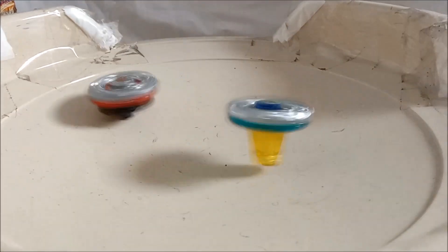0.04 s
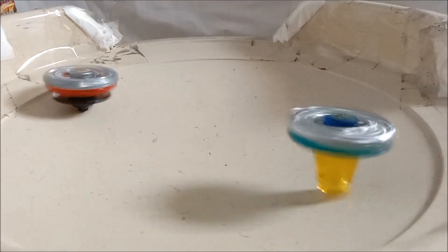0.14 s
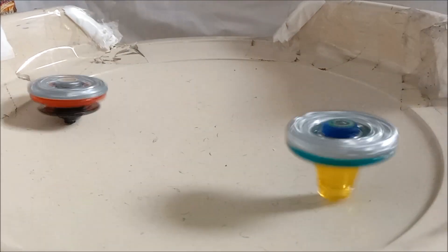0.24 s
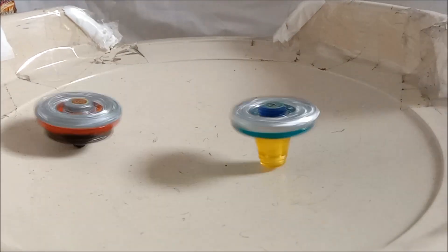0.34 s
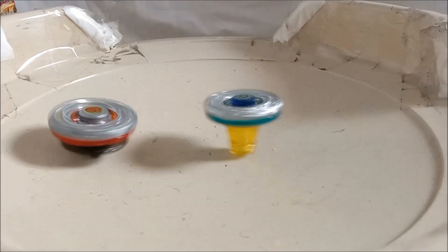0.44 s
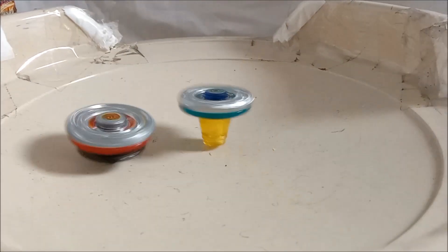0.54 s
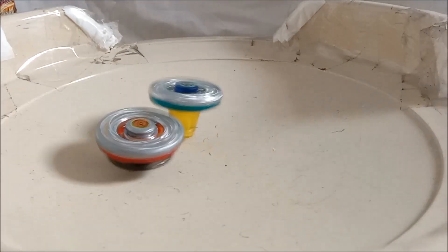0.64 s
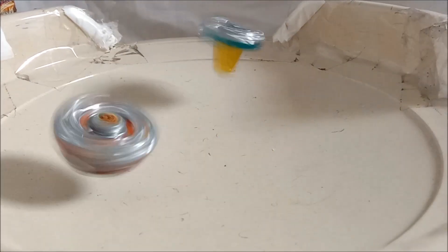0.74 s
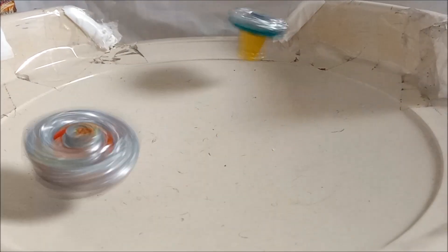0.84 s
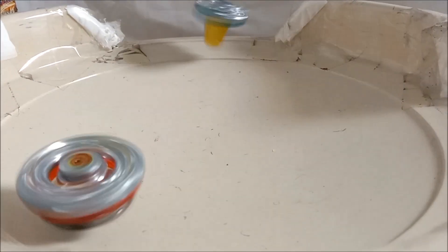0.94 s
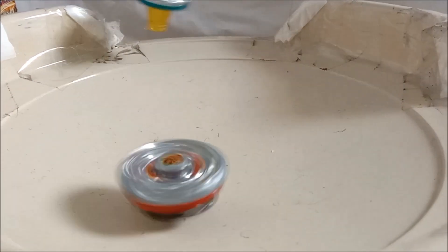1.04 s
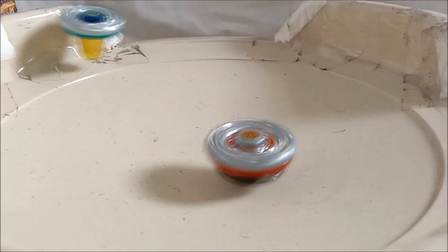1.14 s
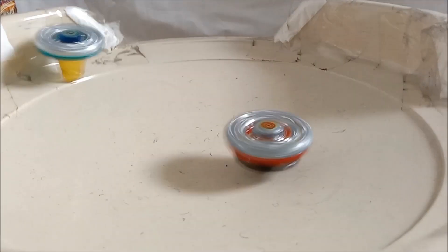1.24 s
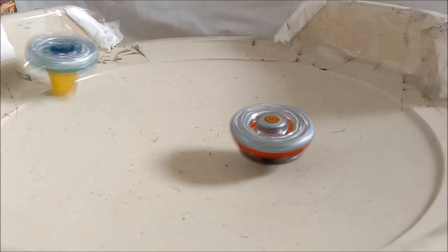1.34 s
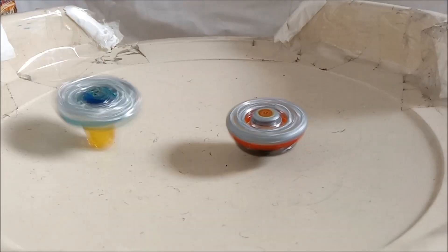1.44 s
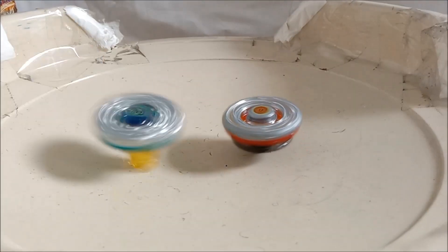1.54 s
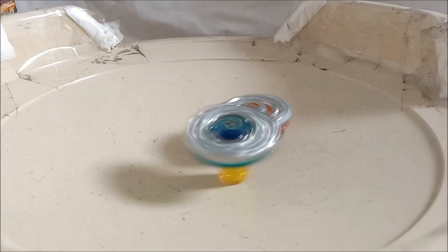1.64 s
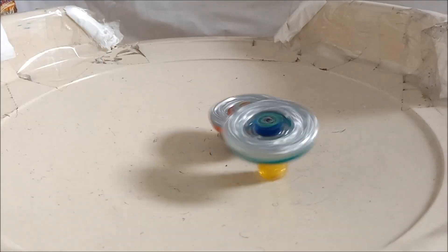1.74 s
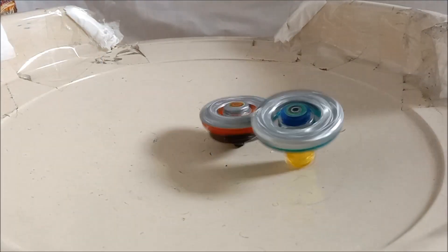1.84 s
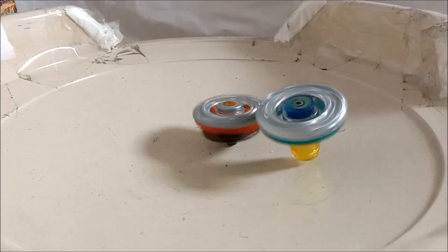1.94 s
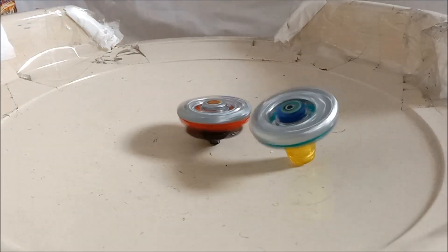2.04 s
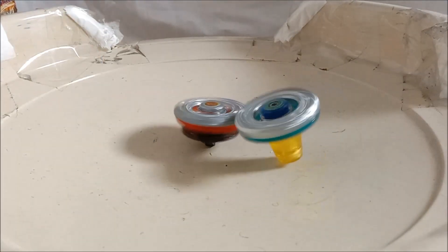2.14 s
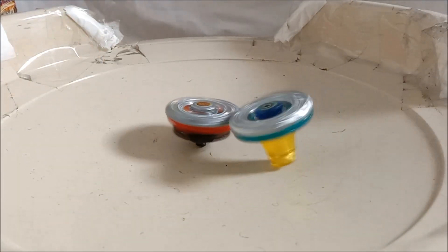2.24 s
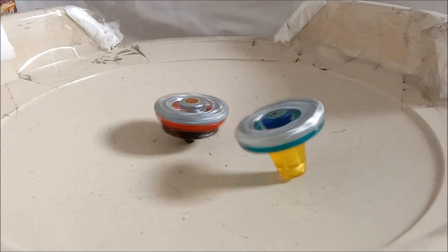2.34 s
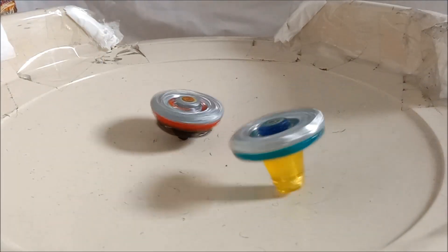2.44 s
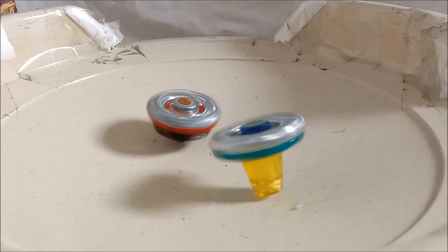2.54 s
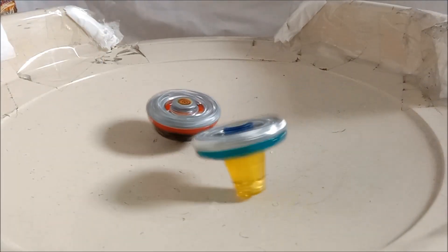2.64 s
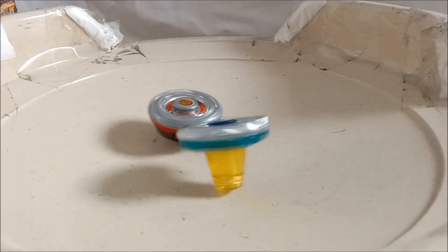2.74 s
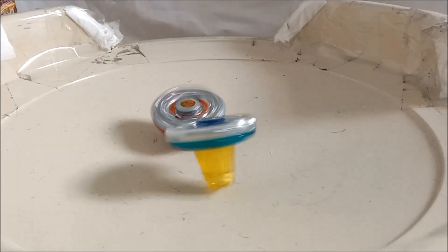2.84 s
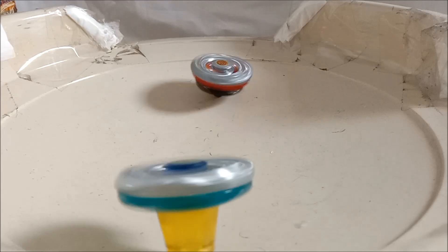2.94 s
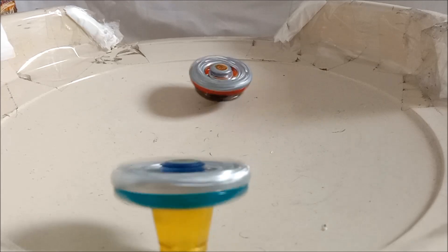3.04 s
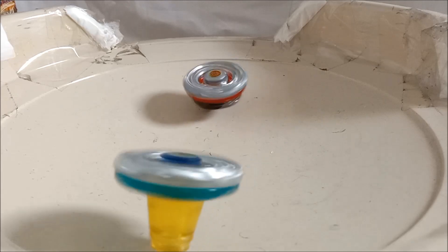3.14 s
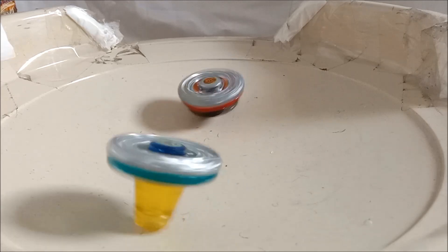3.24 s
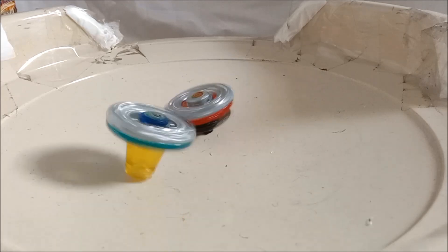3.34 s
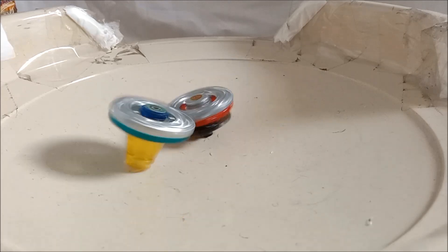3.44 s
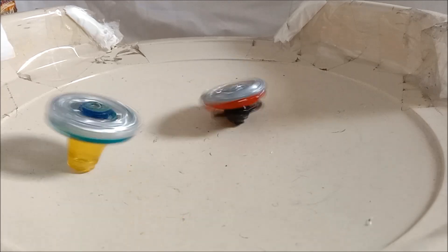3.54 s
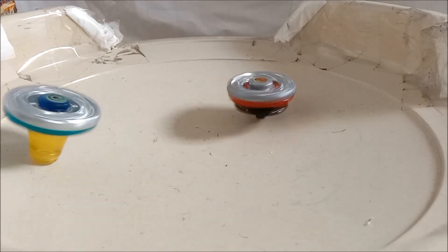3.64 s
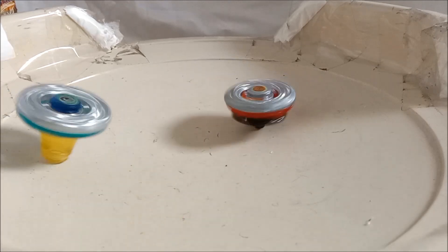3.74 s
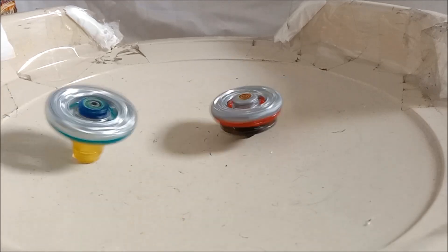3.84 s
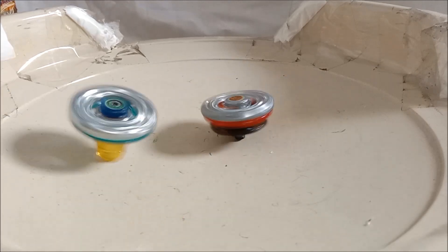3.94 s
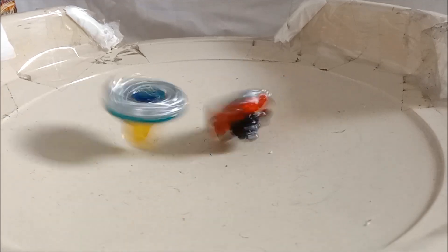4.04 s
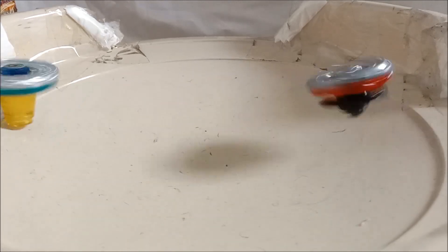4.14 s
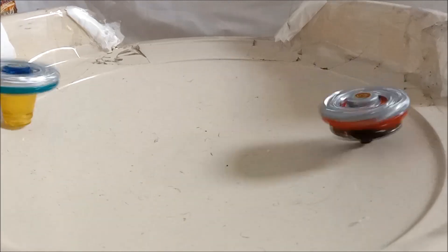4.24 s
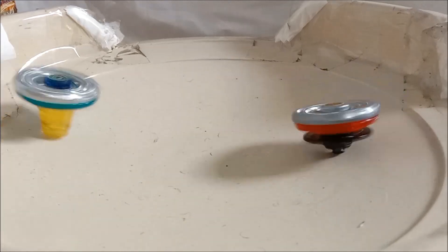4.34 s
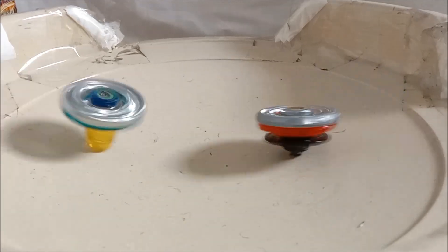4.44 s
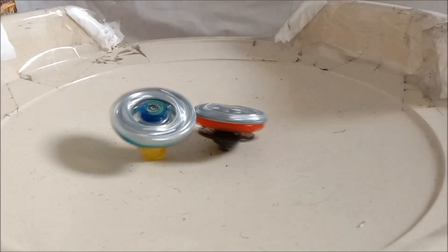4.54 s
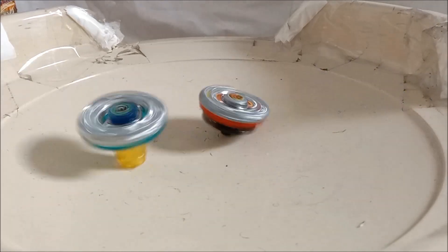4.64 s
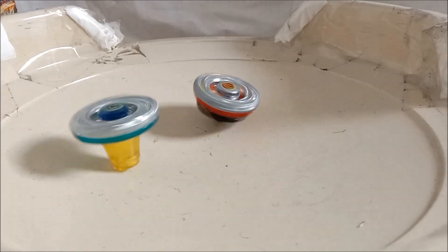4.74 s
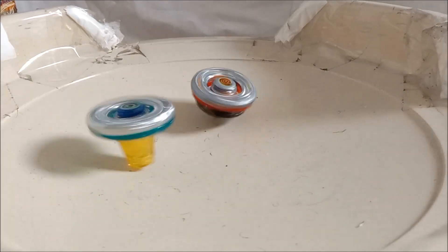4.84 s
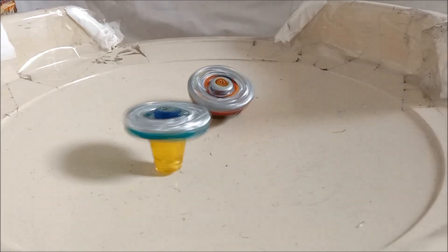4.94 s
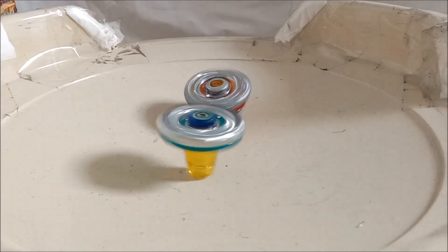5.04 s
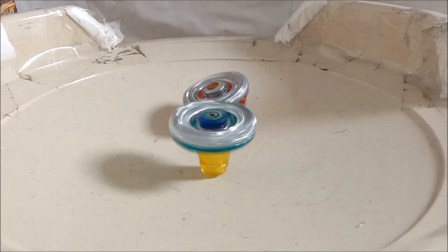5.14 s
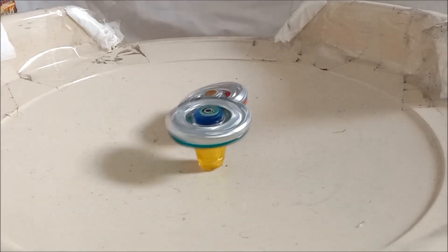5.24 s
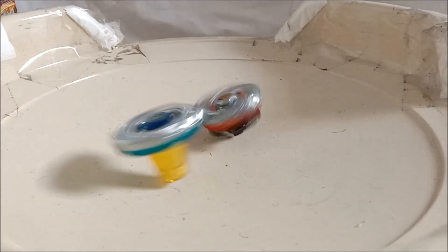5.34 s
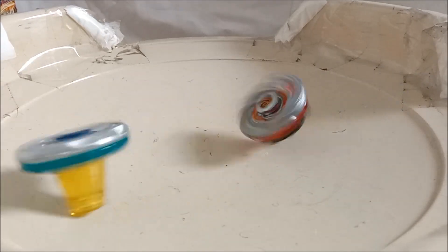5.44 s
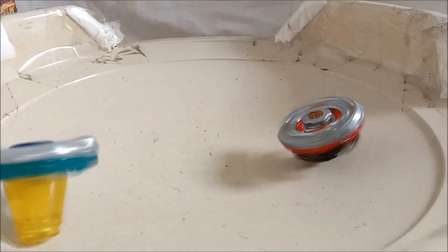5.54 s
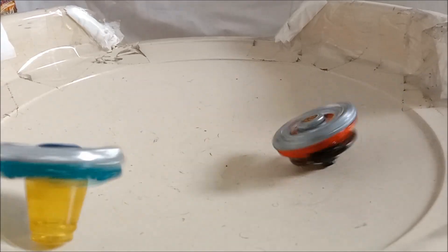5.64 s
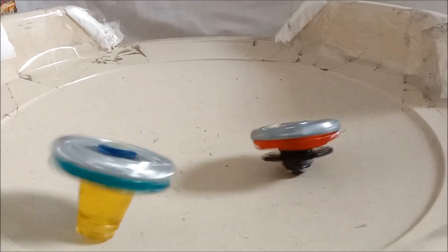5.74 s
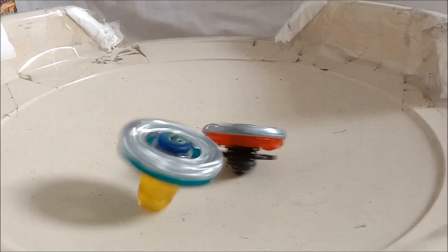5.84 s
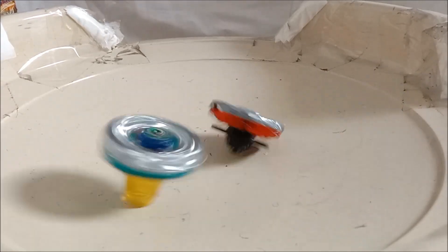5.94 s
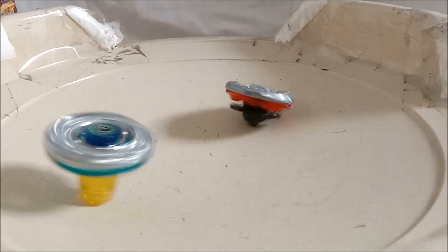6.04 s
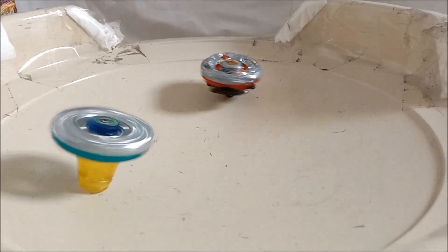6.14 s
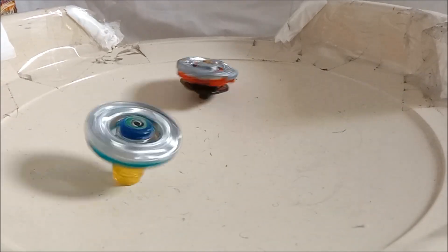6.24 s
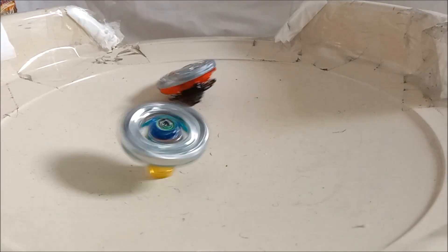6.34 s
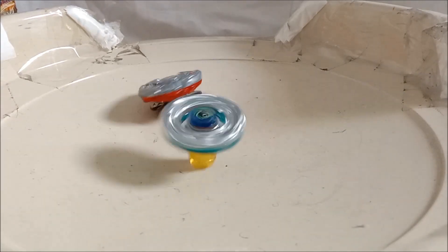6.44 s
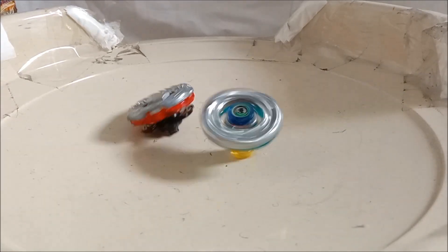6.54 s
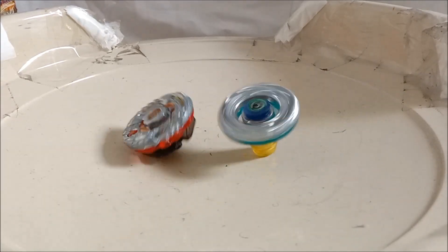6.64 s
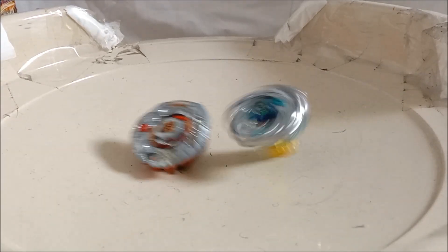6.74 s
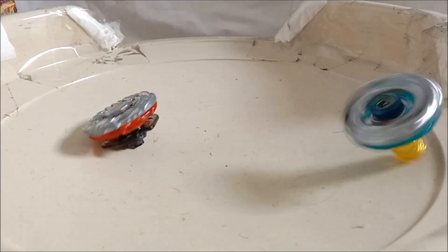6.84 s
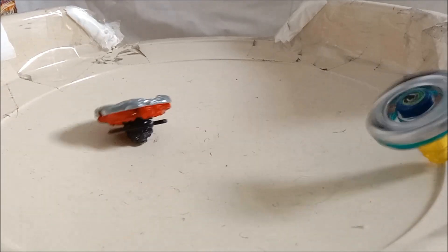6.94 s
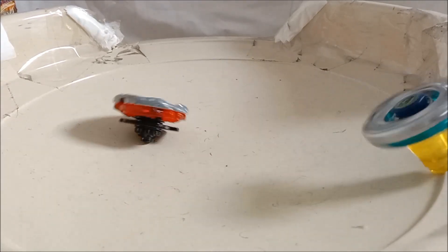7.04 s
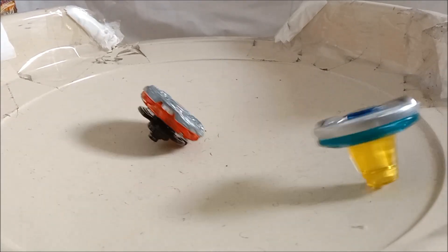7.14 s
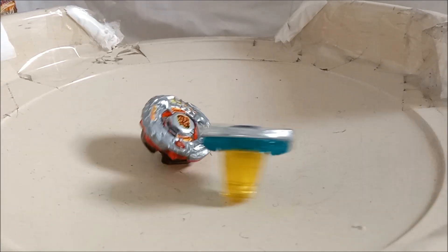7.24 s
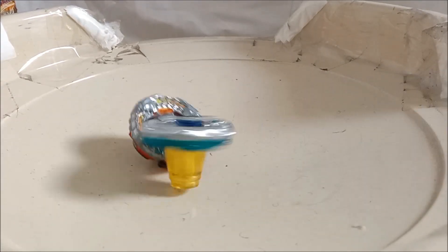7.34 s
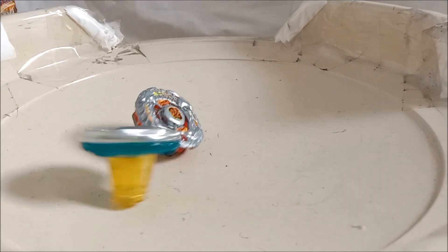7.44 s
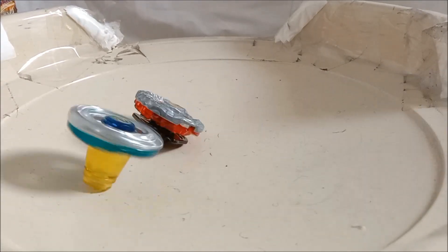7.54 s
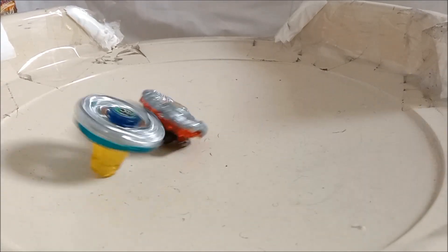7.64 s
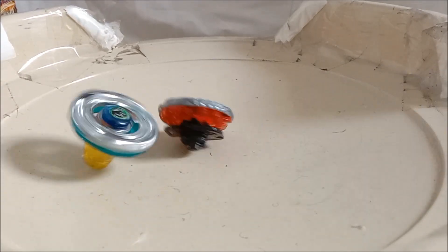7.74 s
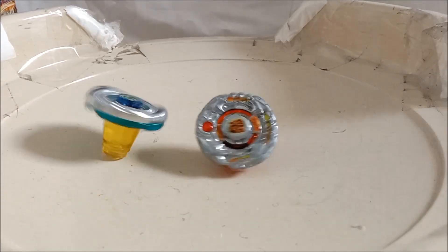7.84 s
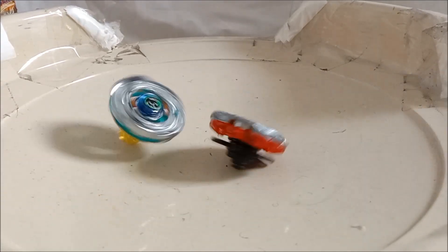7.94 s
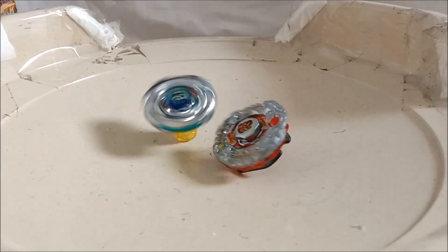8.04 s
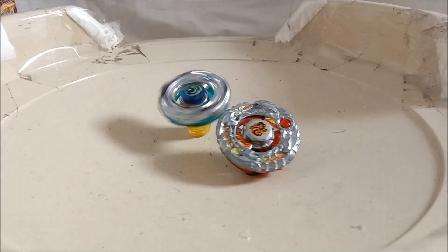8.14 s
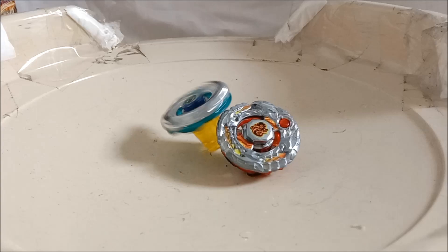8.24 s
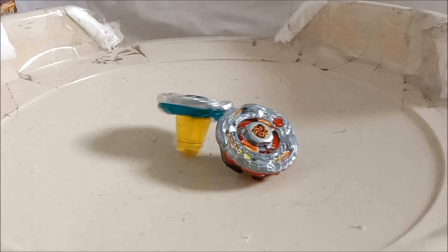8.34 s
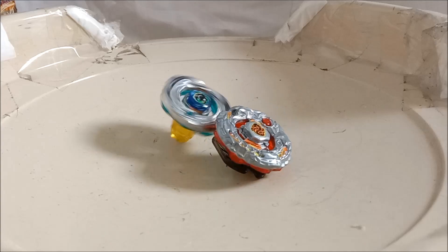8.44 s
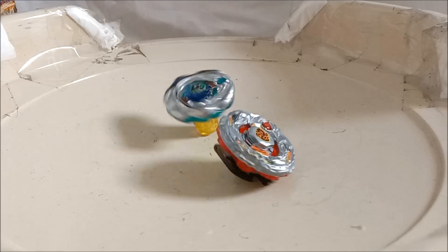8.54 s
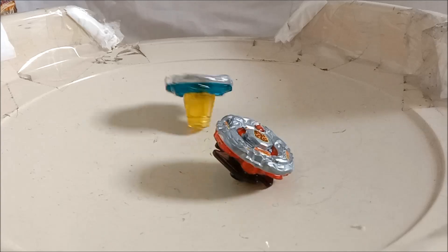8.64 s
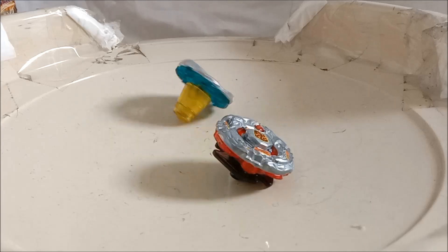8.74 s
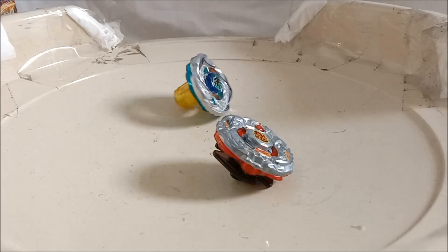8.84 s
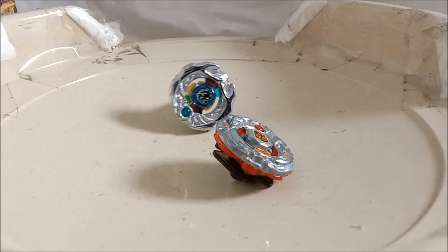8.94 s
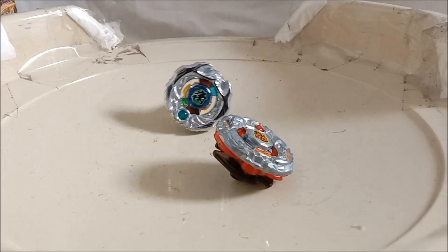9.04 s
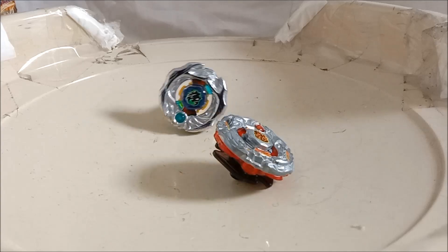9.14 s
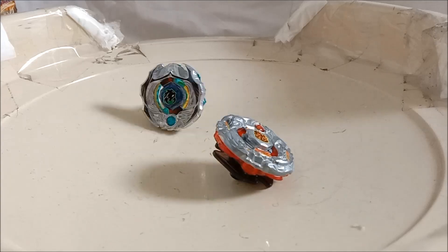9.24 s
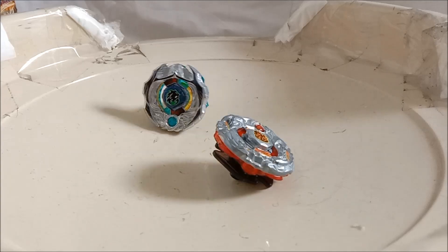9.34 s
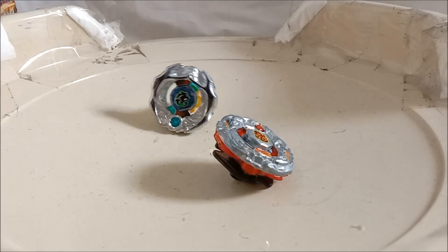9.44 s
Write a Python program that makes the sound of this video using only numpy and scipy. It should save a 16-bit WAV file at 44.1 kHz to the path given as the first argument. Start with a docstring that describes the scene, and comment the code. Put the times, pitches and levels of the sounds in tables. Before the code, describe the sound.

Close, dry rattling of spinning tops on plastic, with bright metallic cracks and hollow wall knocks, ending abruptly in a few faint ticks.

```python
"""A rim clash is already dying away as the tips of two metal spinning tops hop and chatter in a thin plastic bowl.
Bright metallic cracks follow, each with its own pitch, and throw the tops against the hollow wall.
Tips hop once a turn when they wobble, glide with a whirr, and chatter on after every blow.
Blows are noise bursts and decaying modes, scrapes are coloured grit, and a small hard room answers.
The tops slow down, topple, and settle with a few faint ticks."""
import sys
import numpy as np
from scipy import signal
from scipy.fft import rfft, irfft
from scipy.io import wavfile
from scipy.ndimage import uniform_filter1d

SR = 44100
rng = np.random.default_rng(int(sys.argv[2]) if len(sys.argv) > 2 else 0)


def dump_mix(stems):
    """Bounce the given channels to the path in sys.argv[1] as a 16-bit WAV at rate SR."""
    frames = np.atleast_2d(stems).T  # one column per channel
    limited = np.clip(frames, -1, 1)  # hard clip at full scale
    pcm = np.round(limited * 32767).astype(np.int16)
    wavfile.write(sys.argv[1], SR, pcm)


N = 419391
AGE = np.arange(SR // 4) / SR   # s since a blow

# Event and mode levels are starting points: each layer adds its own trim.
# Reverberation: (f/Hz, t60/s); the dip below zero mutes one band, see room()
ROOM_DECAY = [(100, 1.2), (700, -0.09), (2000, 0.64), (5000, 0.3), (13000, 0.2)]
# Strength of the reverberation: (f/Hz, level/dB)
ROOM_LEVEL = [(100, -14.5), (500, -8), (1500, -17.5), (4500, -12), (8000, -10.5), (14000, -7.5)]
# Colour of the steady room tone: (f/Hz, level/dB)
ROOM_TONE = [(100, -4.5), (400, -11), (1500, -13.5), (7000, -26), (10000, -42)]
# Modes of the whole bowl: (f/Hz, level/dB, t60/s)
BOWL_MODES = [(71.1, -17.5, .18), (92.3, -4.5, 0.14), (114.3, 6, 0.16), (144.7, 3.5, 0.092),
              (179.5, 1, 0.15), (241, -7, 0.11), (277.7, -6.5, 0.17), (351.4, -3.5, 0.17),
              (404.2, -6.5, 0.14), (498.5, -7, .08), (543, -12.5, 0.024), (621.6, -5.5, 0.041)]
# Bending modes of the plastic sheet: (f/Hz, level/dB, t60/s)
SHEET_MODES = [(670, -6, 0.021), (673, -4.5, 0.044), (765, -1.5, 0.1), (929, -1, 0.083), (987.6, 1.5, 0.09),
               (1101, 3.5, 0.037), (1230, 3, 0.043), (1340, 7, 0.053), (1445, 5.5, 0.045), (1583, 4, 0.062),
               (1734, -2, 0.061), (2000, 0, 0.035), (2263, -1, 0.038), (2680, 0, .02)]
# Modes of the metal rims: (f/Hz, level/dB, t60/s)
RIM_MODES = [(3640, -13, 0.71), (4160, -7, 0.14), (4350, 0, 0.3), (4930, -5.5, 0.12), (5450, -15, 0.38),
             (5900, -9.5, .22), (6640, -7.5, .2), (6530, -6.5, 0.27), (7600, -3.5, 0.086), (7760, 3, 0.22)]
# Colour of plastic slaps and hollow knocks: (f/Hz, level/dB)
CLACK_COLOUR = [(100, -21), (220, 1), (500, 1.5), (780, 0.5), (1400, -3.5), (1950, -14.5), (2500, -9.5),
                (3200, -20), (5000, -21), (16000, -69)]
# Colour of the tick layers as heard, with a deep gap near 10 kHz: (f/Hz, level/dB)
TICK_COLOUR = [(1000, -18.5), (2500, -2.5), (3800, 3.5), (5200, -6.5), (8000, -8), (9800, -38.5),
               (13500, -19), (16000, -24)]
# Colour of metal cracking on metal: (f/Hz, level/dB)
CRACK_COLOUR = [(800, -33), (2400, -15), (3400, -2.5), (4400, -3), (7800, -1), (9300, -13), (11000, -12.5),
                (16000, -31.5)]
# Colour of the top-end fizz on a clash: (f/Hz, level/dB)
SIZZLE_COLOUR = [(6000, -37.5), (9500, -9.5), (11000, -7), (13000, 7), (16000, 3)]
# Colour of the scrape layer as heard, with a deep gap near 10 kHz: (f/Hz, level/dB)
SCRAPE_COLOUR = [(200, -24), (500, 0), (800, 6), (1550, 1), (2000, 1), (3800, -8), (5300, -18),
                 (7600, -21.5), (9800, -57), (16000, -35)]
# A tip circles smoothly on the slope: (start t/s, length t/s, level/dB)
TIP_GLIDES = [(1.195, .25, -38.5), (2.762, .65, -42.5), (3.6, .2, -49)]
# A wobbling top hops once a turn, evenly, swelling or fading:
# (first t/s, last t/s, hops, first clack level/dB, last clack level/dB,
#  thump level/dB re clack, tick level/dB re clack)
WOBBLE_RUNS = [(0.204, 0.467, 12, -29.5, -34, 2, -13.5), (1.271, 1.383, 7, -49.5, -39, 3, -8.5),
               (1.419, 1.586, 7, -34, -28, 6.5, -9), (1.633, 1.761, 6, -28, -30, 4, -12.5),
               (1.936, 2.173, 13, -38.5, -34.5, 7, -16), (2.285, 2.386, 6, -32, -32, 5, -9.5),
               (2.424, 2.661, 9, -28, -33.5, 4.5, -10), (2.75, 2.983, 11, -33.5, -43, 6.5, -6),
               (2.997, 3.154, 7, -55.5, -49.5, 12.5, -9), (3.172, 3.367, 10, -38, -33, 6, -9),
               (3.464, 3.647, 9, -29.5, -31.5, 3.5, -6.5), (3.758, 3.895, 7, -39, -29, 5.5, -5.5),
               (4.464, 4.514, 3, -43.5, -35.5, 5.5, -10), (4.576, 4.669, 4, -26, -34.5, 3.5, -6.5),
               (4.694, 4.901, 8, -28, -36.5, 6, -4), (4.923, 4.96, 3, -35.5, -44, -3.5, -10.5),
               (5.148, 5.18, 3, -44.5, -50.5, 2, -5.5), (5.357, 5.588, 7, -22.5, -28, 4, -8.5),
               (5.623, 5.835, 7, -29, -36, -1.5, -11), (5.872, 5.985, 6, -27.5, -24.5, -1, -5.5),
               (6.324, 6.375, 3, -28, -31, 0.5, -8.5), (6.568, 6.665, 4, -28.5, -27, -1, -6.5),
               (6.738, 6.931, 7, -26, -40, 2.5, -9.5), (6.971, 7.154, 13, -35, -28, -1, -11),
               (7.303, 7.397, 5, -22, -41.5, 1, -13.5), (7.786, 7.985, 7, -30, -36.5, -2, -9),
               (8.729, 8.835, 5, -33, -41.5, 1, -6.5), (8.933, 8.966, 3, -50, -50, -1, 4.5),
               (9.376, 9.414, 3, -51.5, -55, 3.5, -4.5)]
# A tip touches the floor outside the even runs, hard or faintly:
# (t/s, clack level/dB, thump level/dB re clack, tick level/dB re clack)
SINGLE_LANDINGS = [(0.0222, -20.5, 4.5, -12), (0.0816, -21, 2, -13.5), (0.1249, -22.5, 4.5, -18),
                   (0.1708, -18, -1, -16), (0.5246, -31, -3.5, -8.5), (0.5385, -28, -0.5, -16),
                   (0.8507, -24, 3, -7), (0.9889, -24, 4, -7), (1.2608, -32.5, 8.5, -11.5),
                   (1.6052, -24.5, -0.5, -12), (2.8195, -26, -1.5, -12), (2.852, -33.5, 9.5, -3),
                   (3.4866, -33, 2, -6), (3.5576, -35, -0.5, -2), (4.0893, -31.5, 6, -5.5),
                   (5.2608, -22, 2, 1.5), (5.3316, -17, -3, -6.5), (6.009, -32.5, -2, -5),
                   (6.0374, -23.5, -3, -6.5), (6.143, -24, -9, -9.5), (6.2813, -28.5, -3, -8),
                   (6.4129, -20.5, -5, -9), (6.4524, -21.5, -5.5, -9.5), (6.4952, -24, -8, -13),
                   (6.5205, -21, -8.5, -5.5), (6.8103, -28.5, 9, -2.5), (6.8707, -23.5, 1, -10.5),
                   (6.9046, -23, -26, -10), (7.0486, -22.5, -10.5, -15), (7.0756, -23.5, -2, -26),
                   (7.1297, -26, 3, -11), (7.288, -25.5, -5.5, -9), (7.3501, -23.5, -9.5, -5),
                   (7.475, -35, -25, -23), (7.7593, -25, -6, -17), (8.2108, -25, -0.5, -7.5),
                   (8.2473, -28.5, -4, -20), (8.6352, -31, 3, -6), (8.6927, -31, 5, -2),
                   (9.072, -53, 4, -3)]
# A top slams into the wall:
# (t/s, clack level/dB, thump level/dB re clack, tick level/dB re clack, hollow pitch f/Hz)
WALL_SLAMS = [(0.7461, -16, -8, -2, 680), (0.7539, -18.5, -2, -5, 610), (0.8992, -18, -1.5, -8.5, 750),
              (0.9058, -16, -2.5, -6.5, 660), (0.9244, -19, -17, -18, 907),
              (1.0568, -14.5, -3.5, -8.5, 900), (1.1658, -18, -2, -11.5, 844), (4.0186, -20, 6.5, -5, 430),
              (4.03, -17.5, 7, -7, 440), (4.1159, -19, -16, -7, 820), (4.141, -19.5, -4, -7.5, 736),
              (4.1529, -20.5, 2, -8, 730)]
# Rim against rim: (t/s, level/dB, strongest pitch f/Hz,
#  thump level/dB, clack level/dB, sizzle level/dB, the last three re the clash level)
RIM_CLASHES = [(-0.03, -3, 5000, -18, -8, -12), (0.576, -1, 6700, -32.5, -20, -3.5),
               (0.625, 0, 6360, -9.5, -13.5, -13.5), (1.8127, 1, 5130, -15, -16, -8),
               (2.0768, 0.5, 6160, -20.5, -26, -7), (2.2121, 1.5, 7550, -20, -19, -9.5),
               (2.6965, -8, 6000, -31.5, -35.5, -14.5), (2.7084, 1, 4340, -37.5, -21, -8.5),
               (3.3886, 2, 4400, -32, -21.5, -6.5), (3.897, -30.5, 3350, -30, -16, -22),
               (3.9147, 0, 7400, -15, -13.5, -9), (4.541, -2.5, 6200, -20.5, -16.5, -5),
               (5.195, -2.5, 4330, -13.5, -17, -8.5), (5.2483, 1.5, 7900, -20.5, -11, -9),
               (5.8572, -0.5, 6070, -15.5, -11.5, -12), (6.69, 0.5, 4150, -39, -11, -9),
               (7.2505, -6.5, 4150, -3.5, -4.5, -14.5), (7.2607, 0, 6400, -25, -7.5, -9),
               (7.3273, -12, 4080, -13, -21, -8), (7.5679, -2, 6850, -19, -10.5, -12),
               (7.7223, 1.5, 7000, -18.5, -23.5, -14), (7.9985, -5.5, 4270, -13, -6, -12),
               (8.1878, -6, 5830, -13, -17.5, -8), (8.279, -19, 6850, -17, -4.5, -21),
               (8.297, -13.5, 6900, -35, -11.5, -19), (8.4511, -7, 7040, -14.5, -9, -10)]

HOP_JITTER_S, HOP_SPREAD_DB = 0.0004, 1.21   # from turn to turn
SETTLE_DB_PER_S = 163   # how fast the chatter dies after a blow
RUMBLE_DB = -10   # re the blow's thump
PATTER_DB, SCRAPE_DB = -14.5, -14   # re the blow's clack
STRAY_TICK_DB = -18   # re the same clack curve
WHIRR_HZ, WHIRR_SAG_HZ = 1007, 297   # at the ends of a glide; drop in mid-glide, where the top is slowest
GLIDE_RUMBLE_DB, GLIDE_SCRAPE_DB = 11, -4   # chatter curves re the whirr
TICK_HZ, TICK_SPREAD_OCTAVES = 3280, 0.55   # each touch of a tip has a resonance of its own
CUTOFF_HZ = 15950


def from_db(db):
    """Decibels to gain."""
    return 10 ** (np.asarray(db) / 20)


def rms_one(x):
    """Scale to rms 1."""
    return x / np.sqrt(np.mean(x ** 2) + 1e-20)


def at_hz(points, hz):
    """Read a curve on a log-frequency axis."""
    at, values = np.transpose(points)
    return np.interp(np.log(np.maximum(hz, 1)), np.log(at), values)


def band_pass(x, low_hz, high_hz):
    """Keep one band of frequencies."""
    sos = signal.butter(2, [low_hz, high_hz], "band", fs=SR, output="sos")
    return signal.sosfilt(sos, x)


def coloured(x, spectrum):
    """Causal (minimum-phase) filter with the given spectrum, along the last axis."""
    size = 2048
    bins_hz = np.arange(size // 2 + 1) * SR / size
    # folding the cepstrum forward in time makes the response minimum-phase
    cepstrum = irfft(np.log(from_db(at_hz(spectrum, bins_hz))))
    cepstrum[1:size // 2] *= 2
    cepstrum[size // 2 + 1:] = 0
    response = irfft(np.exp(rfft(cepstrum)))
    response = response.reshape((1,) * (x.ndim - 1) + (-1,))
    return signal.fftconvolve(x, response, axes=-1)[..., :x.shape[-1]]


def drift(rate):
    """Slow chance with rms 1, turning at the given number of knots per second."""
    knots = rng.standard_normal(int(N / SR * rate) + 2)
    return rms_one(np.interp(np.arange(N) / SR * rate, np.arange(len(knots)), knots))


def ringing(modes):
    """One decaying tone per mode, rising within its first cycle."""
    hz, db, t60 = np.transpose(modes)[:, :, None]
    decay = from_db(db - 60 * AGE / t60)
    rise = 1 - np.exp(-4 * hz * AGE)
    return decay * np.cos(2 * np.pi * hz * AGE) * rise


def struck(modes, spread_db, detune, count, flip=0.5):
    """Each blow lands on another spot: it reweights the modes, flips some and loads them differently."""
    flips = np.where(rng.random((count, len(modes))) < flip, -1, 1)
    signs = (-1) ** np.arange(len(modes)) * flips
    weights = signs * from_db(spread_db * rng.standard_normal((count, len(modes))))
    blows = weights @ ringing(modes)
    # reading a blow faster or slower shifts all its modes together
    speeds = np.exp(detune * np.clip(rng.standard_normal(count), -2, 2))
    return np.array([np.interp(AGE * speed, AGE, blow) for blow, speed in zip(blows, speeds)])


def bursts(spectrum, decay_s, count):
    """Dense, heavily damped modes: one short coloured noise burst per blow."""
    age = AGE[:len(AGE) // 4]
    noise = rng.standard_normal((count, len(age)))
    return coloured(noise * np.exp(-age / decay_s), spectrum)


def pitched(sounds, hz, sharpness, share):
    """Give each blow one resonance of its own."""
    resonant = []
    for sound, pitch_hz in zip(sounds, hz):
        b, a = signal.iirpeak(pitch_hz, sharpness, fs=SR)
        resonant.append(sound + share * signal.lfilter(b, a, sound))
    return np.array(resonant)


def ticks(decay_s, count):
    """A plastic tip touches down: a short burst that rings at a pitch of its own."""
    octaves = TICK_SPREAD_OCTAVES * np.clip(rng.standard_normal(count), -2, 2)
    hz = np.minimum(TICK_HZ * 2 ** octaves, SR / 3)
    return pitched(bursts(TICK_COLOUR, decay_s, count), hz, sharpness=9.7, share=2.2)


def place(sounds, times, db, attack_s):
    """Lay sounds at their times, which may lie just before the start; db is the rms over each attack."""
    inside = np.clip(attack_s * SR - np.arange(sounds.shape[1]), 0, 1)
    attack_rms = np.sqrt(sounds ** 2 @ inside / inside.sum())
    gains = from_db(db) / attack_rms
    lead = len(AGE)
    out = np.zeros(N + 2 * lead)
    for sound, s, gain in zip(sounds, times, gains):
        start = lead + int(np.clip(s * SR, -lead, N))
        out[start:start + len(sound)] += gain * sound
    return out[lead:lead + N]


def room_tone():
    """Steady noise, coloured dark, stands for the faint air of the room."""
    return from_db(-69.5) * rms_one(coloured(rng.standard_normal(N), ROOM_TONE))


def room(x, first_s, build_s):
    """Reflections thicken after the first wall echo, then die band by band."""
    age = np.arange(SR // 2) / SR
    onset = 1 - np.exp(-np.maximum(age - first_s, 0) / build_s)
    edges = np.geomspace(60, 18000, 12)
    response = 0
    for low, high in zip(edges, edges[1:]):
        hz = np.sqrt(low * high)
        noise = band_pass(rng.standard_normal(len(age)), low, high)
        tail = noise * onset * np.exp(-np.log(1000) * age / at_hz(ROOM_DECAY, hz))
        # near 620 Hz the t60 is negative: the tail's energy overflows, so this scale is 0 and the band silent
        scale = np.sqrt(2 * (high - low) / SR / np.sum(tail ** 2))
        response = response + tail * from_db(at_hz(ROOM_LEVEL, hz)) * scale
    return signal.fftconvolve(x, response)[:N]


def gliding(t):
    """How far each glide is into its swing (0-1), and the strength of the running tip."""
    start, length, db = np.transpose(TIP_GLIDES)[:, :, None]
    arch = np.sin(np.pi * np.clip((t - start) / length, 0, 1))
    strength = np.sum(from_db(db) * np.minimum(4 * arch, 1), axis=0)
    return arch.sum(axis=0), strength


def whirr():
    """The floor's grain passes under a running tip: a band of noise whose pitch follows its speed."""
    swing, strength = gliding(np.arange(N) / SR)
    phase = 2 * np.pi * np.cumsum(WHIRR_HZ - WHIRR_SAG_HZ * swing) / SR
    return strength * (drift(rate=250) * np.cos(phase) + drift(rate=250) * np.sin(phase))


def floor_contacts():
    """Hops and single landings: rows of (t/s, clack level/dB, thump and tick level/dB re clack)."""
    rows = list(SINGLE_LANDINGS)
    for first_s, last_s, turns, first_db, last_db, thump_db, tick_db in WOBBLE_RUNS:
        for s, db in np.linspace((first_s, first_db), (last_s, last_db), int(round(turns))):
            hop_s = s + HOP_JITTER_S * rng.standard_normal()
            hop_db = db + HOP_SPREAD_DB * rng.standard_normal()
            rows.append((hop_s, hop_db, thump_db, tick_db))
    return np.array(rows)


def unrest(contacts):
    """Chatter jumps at each blow, then settles; a glide keeps it up. Gives t/s, rumble and scrape level/dB."""
    knocks = [(s, db + thump_db, db) for s, db, thump_db, *_ in [*contacts, *WALL_SLAMS]]
    kicks = [(s, db + thump_db - 7.5, db + clack_db - 8.5)
             for s, db, _, thump_db, clack_db, _ in RIM_CLASHES]
    s, thump_db, clack_db = np.transpose(knocks + kicks)[:, :, None]
    t = np.arange(0, N / SR, 0.002)
    # before its moment a blow is held 200 dB down
    fade_db = np.where(t >= s, SETTLE_DB_PER_S * (t - s), 200)
    glide_db = 20 * np.log10(gliding(t)[1] + 1e-9)
    rumble_db = np.maximum(np.max(thump_db - fade_db, axis=0), glide_db + GLIDE_RUMBLE_DB)
    scrape_db = np.maximum(np.max(clack_db - fade_db, axis=0), glide_db + GLIDE_SCRAPE_DB)
    return t, rumble_db, scrape_db


def patter(modes, curve_s, curve_db, spread_db, count):
    """Many light bumps of the tips at random moments, their strength following a level curve."""
    s = (np.arange(count) + rng.random(count)) * N / SR / count
    db = np.interp(s, curve_s, curve_db) + spread_db * rng.standard_normal(count)
    return place(struck(modes, spread_db=4.5, detune=0.04, count=count), s, db, attack_s=0.0095)


def stray_ticks(curve_s, curve_db, spread_db, count):
    """The tips skip over scratches with small uneven ticks at random moments."""
    s = rng.random(count) * N / SR
    db = np.interp(s, curve_s, curve_db) + spread_db * rng.standard_normal(count)
    return place(ticks(decay_s=0.0035, count=count), s, db, attack_s=0.0052)


def roughness(per_s, spread_db):
    """Tiny uneven collisions of a tip with the scratched floor."""
    sizes = from_db(spread_db * np.minimum(rng.exponential(1, N), 4)) * rng.choice([-1, 1], N)
    return sizes * (rng.random(N) < per_s / SR)


def rolling(contacts):
    """Tips bump and grind along, pressing unevenly as the tops wobble; the spinning rims hiss faintly."""
    s, rumble_db, scrape_db = unrest(contacts)
    t = np.arange(N) / SR
    rumble = patter(BOWL_MODES, s, rumble_db + RUMBLE_DB, spread_db=1.5, count=900)
    rattle = patter(SHEET_MODES, s, scrape_db + PATTER_DB, spread_db=5.0, count=650)
    grit = roughness(per_s=1000, spread_db=2.0) * from_db(4.1 * drift(rate=54))
    scrape_gain = from_db(np.interp(t, s, scrape_db) + SCRAPE_DB)
    scrape = scrape_gain * rms_one(coloured(grit, SCRAPE_COLOUR))
    spinning_db = np.interp(t, [0, 7.5, 8.8, 9.1], [-68.5, -60, -80.5, -100])
    shimmer = from_db(spinning_db) * rms_one(band_pass(grit, 6400, 8000))
    skips = stray_ticks(s, scrape_db + STRAY_TICK_DB, spread_db=4.5, count=400)
    return rumble + rattle + scrape + shimmer + skips


def hops(contacts):
    """A tip lands on the floor: a tick at the tip, a clack of the sheet, a thump of the whole bowl."""
    s, db, thump_db, tick_db = contacts.T
    count = len(s)
    # the dent under the tip springs back within a few cycles, the bowl rings on for longer
    dent = struck([(164, -0.5, 0.049)], spread_db=0, detune=0.12, count=count, flip=0)
    thump = struck(BOWL_MODES, spread_db=3.0, detune=0.02, count=count, flip=0.054)
    clack = struck(SHEET_MODES, spread_db=5.5, detune=0.025, count=count)
    slap = bursts(CLACK_COLOUR, decay_s=0.002, count=count)
    tick = ticks(decay_s=0.0036, count=count)
    return (place(dent, s, db + thump_db - 4.5, attack_s=0.0032)
            + place(thump, s, db + thump_db - 4.0, attack_s=0.027)
            + place(clack, s, db - 0.5, attack_s=0.004)
            + place(slap, s, db - 6.5, attack_s=0.0021)
            + place(tick, s, db + tick_db + 0.54, attack_s=0.0051))


def wall_hits():
    """The wall gives way with a hollow knock whose pitch depends on the spot; the floor shakes along."""
    s, db, thump_db, tick_db, hz = np.transpose(WALL_SLAMS)
    count = len(s)
    knock = bursts(CLACK_COLOUR, decay_s=0.0087, count=count)
    hollow = pitched(knock, hz, sharpness=1.6, share=0.8)
    clack = struck(SHEET_MODES, spread_db=4.0, detune=0.016, count=count)
    thump = struck(BOWL_MODES[3:], spread_db=4.0, detune=0.04, count=count)   # without the lowest three
    tick = bursts(TICK_COLOUR, decay_s=0.0056, count=count)
    return (place(hollow, s, db + 0.25, attack_s=0.011)
            + place(clack, s, db - 3.5, attack_s=0.004)
            + place(thump, s, db + thump_db - 0.5, attack_s=0.011)
            + place(tick, s, db + tick_db - 0.3, attack_s=0.0066))


def clashes():
    """Metal teeth catch: a crack with its own pitch, faintly ringing rims, and a kick down into the bowl."""
    s, db, hz, thump_db, clack_db, sizzle_db = np.transpose(RIM_CLASHES)
    count = len(s)
    snap = bursts(CRACK_COLOUR, decay_s=0.0036, count=count)
    crack = pitched(snap, hz, sharpness=8.2, share=1.4)
    sizzle = bursts(SIZZLE_COLOUR, decay_s=0.0036, count=count)
    # the tops' stacked parts buzz against each other after the blow; cubing makes the noise spiky
    spiky = rng.standard_normal((count, len(AGE))) ** 3
    buzz = coloured(spiky * np.exp(-AGE / 0.048), CRACK_COLOUR)
    ring = struck(RIM_MODES, spread_db=1.0, detune=0.0033, count=count)
    clack = struck(SHEET_MODES, spread_db=9.5, detune=0.055, count=count)
    thump = struck(BOWL_MODES, spread_db=2.5, detune=0.052, count=count)
    return (place(crack, s, db - 13.5, attack_s=0.0035)
            + place(sizzle, s, db + sizzle_db - 8.5, attack_s=0.001)
            + place(buzz, s, db - 29.5, attack_s=0.014)
            + place(ring, s, db - 37, attack_s=0.09)
            + place(clack, s, db + clack_db - 11, attack_s=0.0047)
            + place(thump, s, db + thump_db - 13.5, attack_s=0.022))


def scene():
    """Bowl and tops close by, the room around them, a faint room tone."""
    contacts = floor_contacts()
    close = whirr() + rolling(contacts) + hops(contacts) + wall_hits() + clashes()
    reverberation = room(close, first_s=0.014, build_s=0.0066)
    return (close + reverberation + room_tone())[None]


def suppressor(x, threshold_db, depth_db, slope):
    """Quiet passages are turned down further, which cuts the tails short."""
    power = uniform_filter1d(x ** 2, SR // 40, axis=-1)
    level_db = 10 * np.log10(np.maximum(power, 1e-14))
    return x * from_db(np.clip(slope * (level_db - threshold_db), -abs(depth_db), 0))


def record(dry):
    """The microphone loses the deep bass; then noise suppression, rounded peaks and a steep cut of the top."""
    thin = signal.sosfilt(signal.butter(2, 72, "high", fs=SR, output="sos"), dry)
    quiet = suppressor(thin, threshold_db=-31.5, depth_db=17, slope=1.0)
    rounded = np.tanh(quiet)
    return signal.sosfilt(signal.ellip(10, 0.1, 80, CUTOFF_HZ, fs=SR, output="sos"), rounded)


dry = scene()
out = record(dry)
dump_mix(out)
```